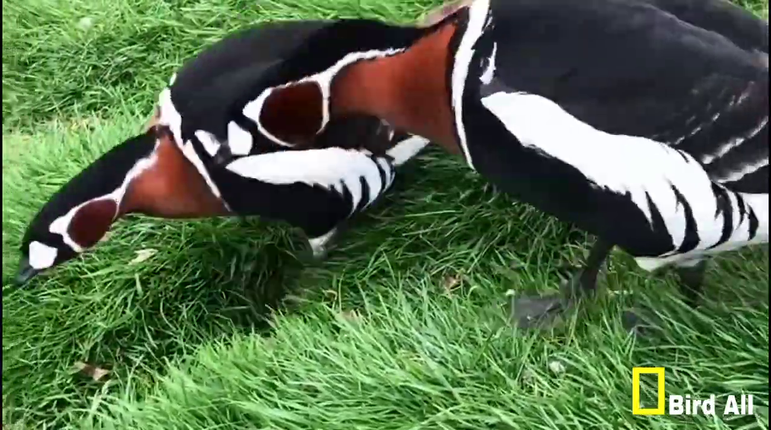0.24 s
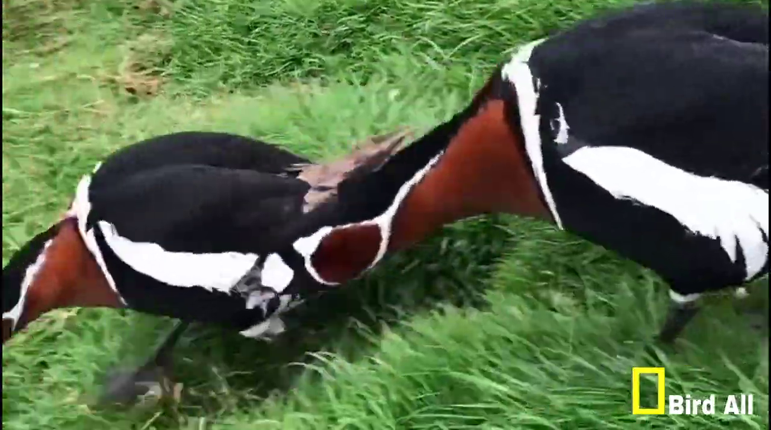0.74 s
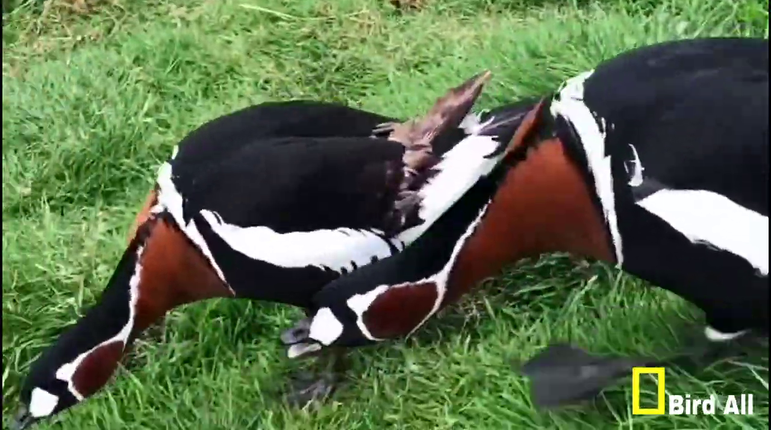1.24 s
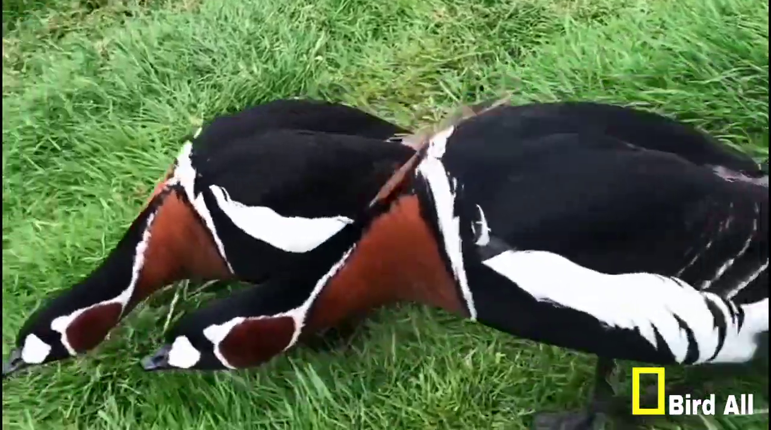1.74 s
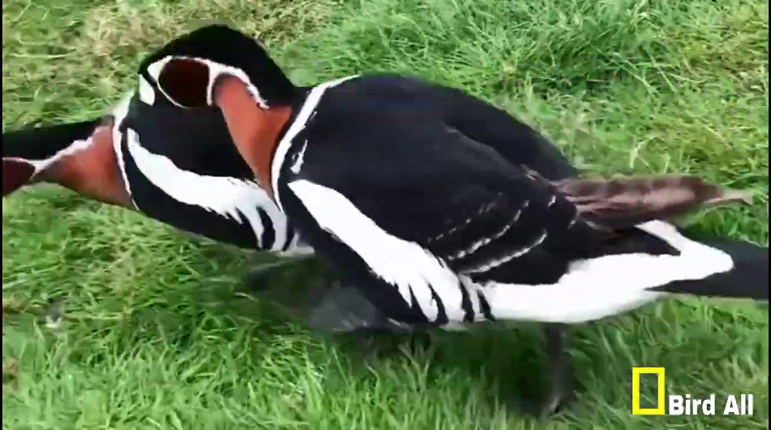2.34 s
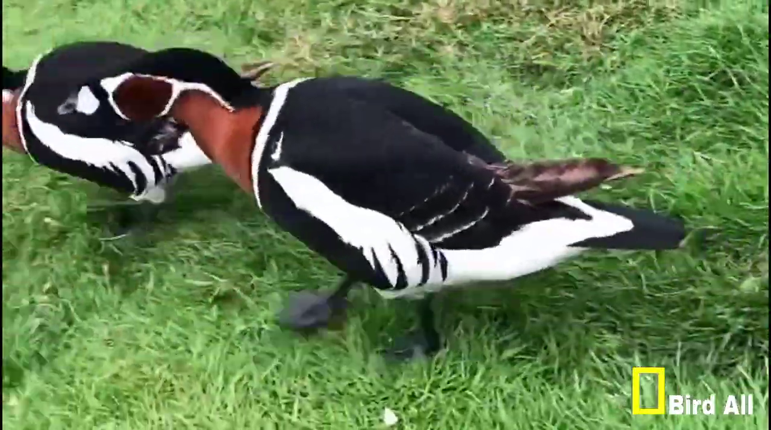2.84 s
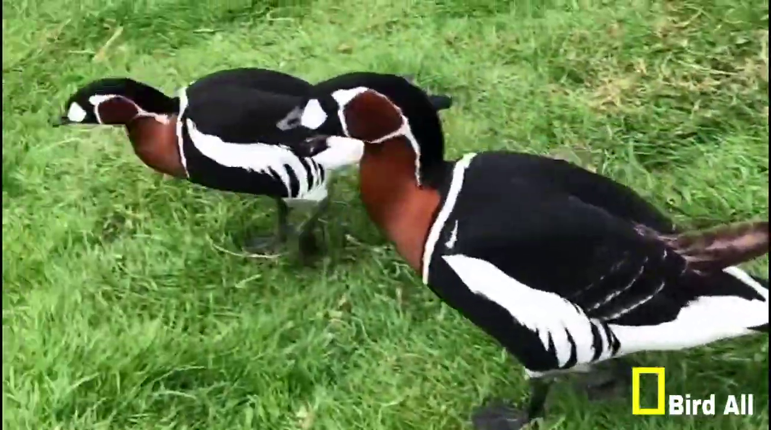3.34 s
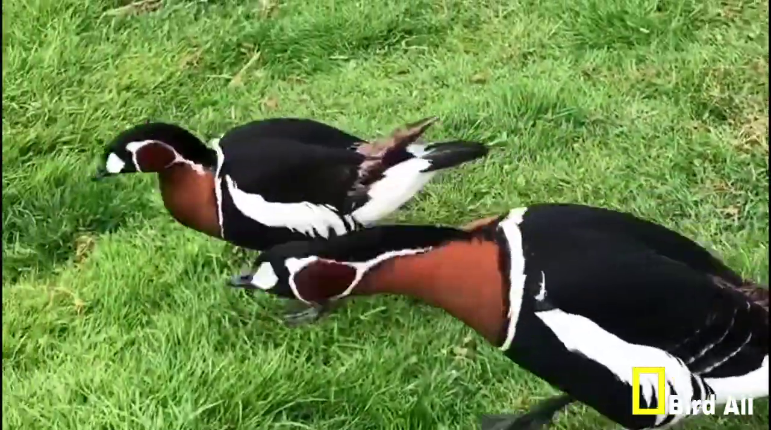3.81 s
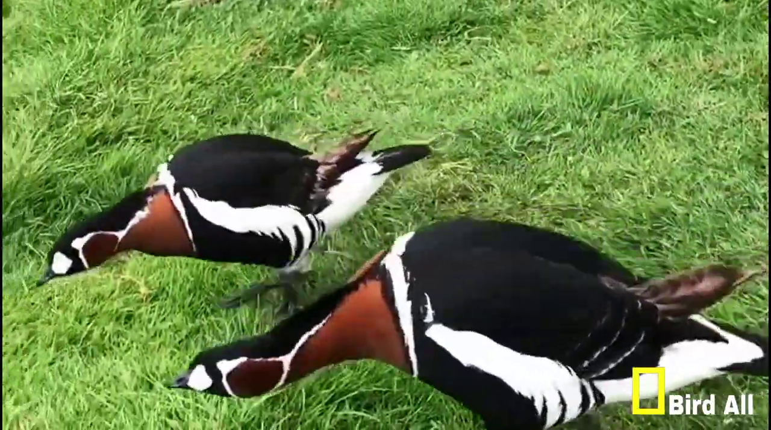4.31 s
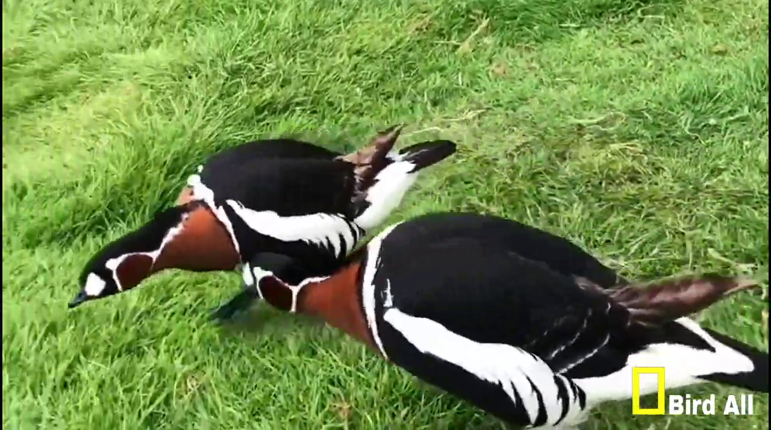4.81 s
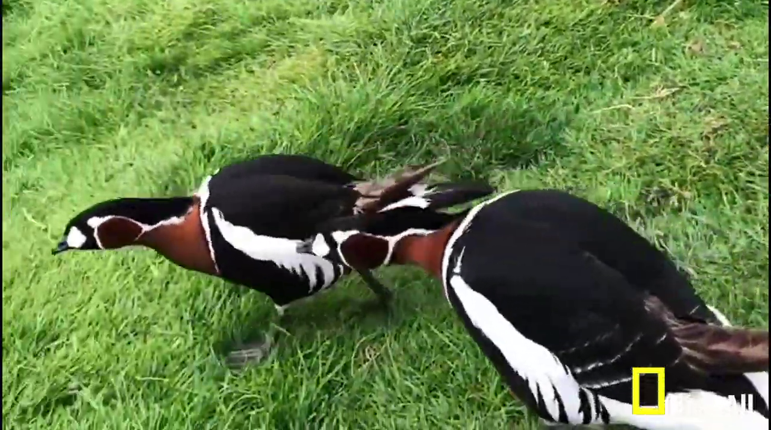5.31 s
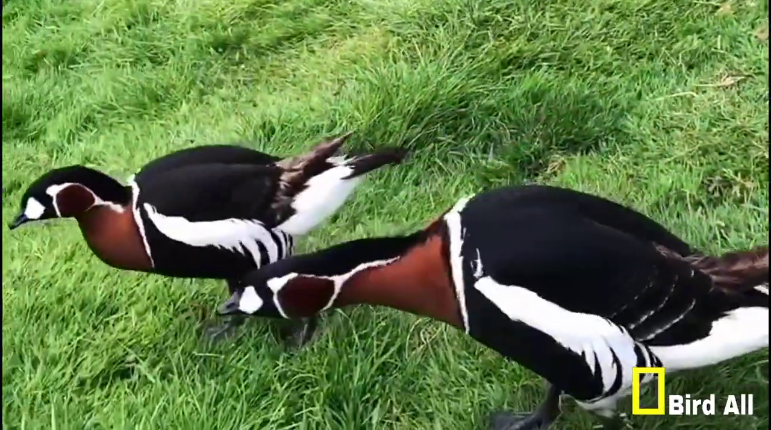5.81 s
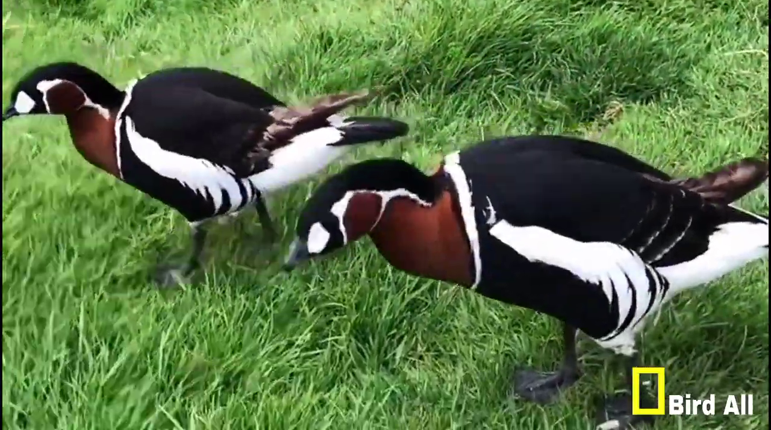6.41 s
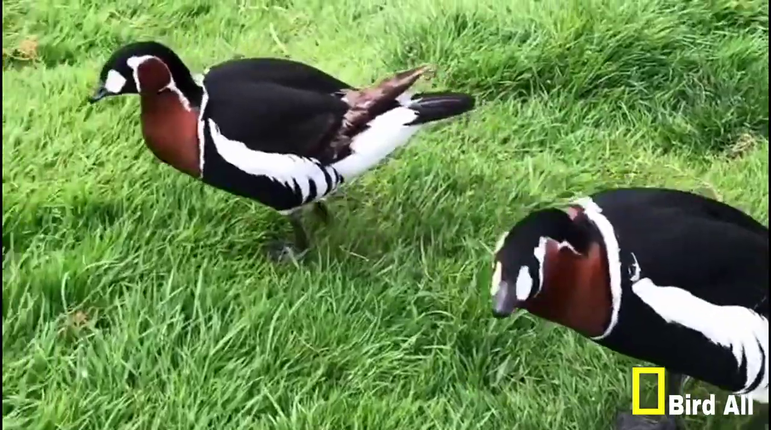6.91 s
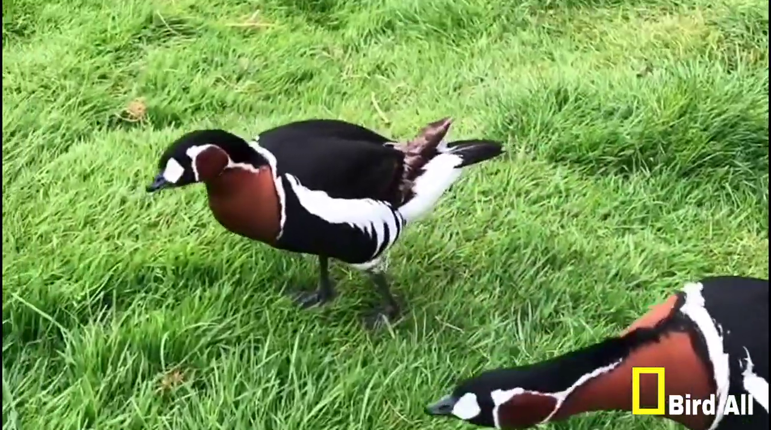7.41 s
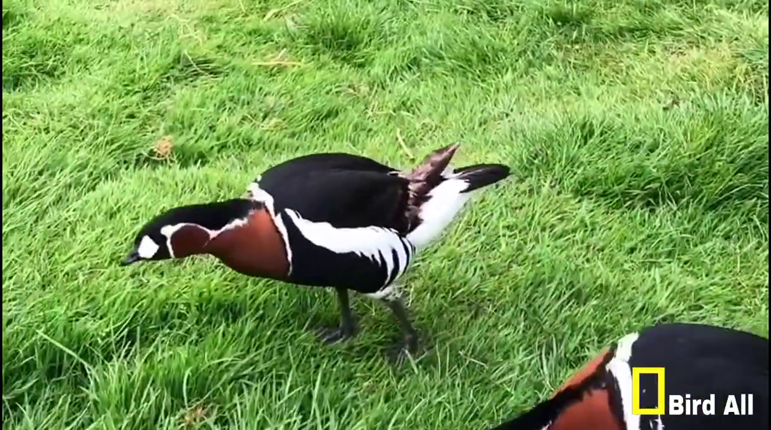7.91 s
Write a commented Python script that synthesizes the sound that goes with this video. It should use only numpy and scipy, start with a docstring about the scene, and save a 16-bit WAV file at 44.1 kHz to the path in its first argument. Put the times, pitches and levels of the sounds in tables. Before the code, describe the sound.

Geese squabble up close with short shrill yelps and low grunts, in three clusters, over faint songbird chirps outdoors.

```python
"""A faint outdoor rumble and a hiss of leaves, with small songbirds chirping in a long, wide echo.
Up close, red-breasted geese squabble on a lawn: seven shrill yelps with low grunts between them.
A yelp starts as a rasp (a slow membrane chops a fast one), clears into a whistle and slides down
an octave; a grunt is the slow membrane alone. Hoarse calls come from far off, later one soft thud."""
import sys
import numpy as np
from scipy import signal
from scipy.fft import rfft, irfft, next_fast_len
from scipy.io import wavfile
from scipy.ndimage import uniform_filter1d, minimum_filter1d, map_coordinates

SR = 44100
rng = np.random.default_rng(int(sys.argv[2]) if len(sys.argv) > 2 else 0)


def transcribe(signal):
    """Save signal, clipped to [-1, 1], as a 16-bit WAV file at the path in sys.argv[1]."""
    frames = np.atleast_2d(signal).T
    limited = np.clip(frames, -1, 1)
    pcm = np.round(limited * 32767).astype(np.int16)
    wavfile.write(sys.argv[1], SR, pcm)


N = 359415

# tone of the outdoor bed: frequency_hz, gain_db
AIR_SPECTRUM = [(15, -72), (25, -34.5), (50, -10.5), (69, -0.5), (150, -10.5), (301, -18), (856, -20),
                (1310, -21), (2180, -19.5), (3440, -21), (4870, -17.5), (6200, -22), (7090, -23),
                (8100, -25.5), (15000, -30.5)]
# stereo width of the bed: frequency_hz, side_over_mid_db
AIR_WIDTH = [(300, -51), (700, -19.5), (1300, -12.5), (2400, -5), (8000, 2.0)]
# single songbird notes: start_s, length_s, middle_hz, glide_octaves, relative_level_db, buzz_0_to_1,
# echo_send_db
SONG_NOTES = [ (0.068, .052, 7330, 0.35, -56, 0.2, -25), (.103, 0.067, 3270, -0.31, -59.5, 0.52, 6),
              (0.408, 0.28, 2450, 0.25, -60, .6, -7), (0.442, 0.13, 5730, -0.56, -52.5, 0.97, -12),
              (0.461, 0.22, 4430, 0.12, -59, 0.95, 9.5), (0.816, .13, 3810, .03, -36, 0.23, -3),
              (.93, 0.1, 4446, .08, -41, 1, 1), (1.001, 0.058, 4402, 0, -29.5, 0.2, -2.5),
              (1.052, .27, 3560, 0, -47, 0, -13), (1.932, 0.072, 4250, -.3, -47.5, 1, 9),
              (2.073, 0.15, 3616, -0.0065, -36, 0.28, -9), (2.192, .258, 3980, 0.1, -38, .55, -5.5),
              (2.14, 0.49, 2783, -.2, -54, 0.98, -2), (2.571, 0.09, 3050, 0.16, -48.5, .6, 2),
              (2.767, .06, 3410, -.4, -46.5, 1, 4.5), (2.835, 0.09, 6530, .18, -53, 1, 0),
              (3.797, .25, 5520, -0.02, -55.5, 0.08, -4), (4.066, 0.13, 6490, 0.041, -53.5, 0.2, -4),
              (4.485, 0.13, 5180, -0.24, -56.5, 0.88, -12), (4.835, 0.067, 3750, -.1, -59, 0, -11),
              (5.159, 0.044, 6690, 0.27, -57.5, 1, 12), (5.503, 0.043, 3870, -0.015, -52.5, .13, -5),
              (5.558, .084, 7140, -.12, -53.5, .5, 0), (5.804, .2, 5054, -0.18, -51.5, 1, -20.5),
              (6.118, 0.23, 7290, 0.24, -56, 0.09, -20.5), (6.343, 0.13, 2600, -0.014, -59, 0.53, 1.5),
              (6.774, 0.112, 2180, -0.25, -60, 0.27, 4.5), (6.792, 0.088, 5550, -0.25, -57, 0.7, -19.5),
              (7.037, 0.12, 2916, 0.32, -53, 0.77, 7), (7.381, 0.12, 4600, 0.27, -50.5, 0.9, -2.5),
              (7.56, .083, 2200, -0.011, -55.5, 0.14, 2), (7.613, 0.072, 3330, 0, -46.5, 0.1, 1),
              (7.711, .096, 7200, 0.034, -53, 0.9, -18), (8.01, .11, 2975, 0.12, -50.5, 1, 5.5)]
# songbird phrases on one repeated note: start_s, until_s, spacing_s, step_db, length_s, middle_hz,
# glide_octaves, relative_level_db, buzz_0_to_1, echo_send_db
SONG_PHRASES = [ (1.386, 1.85, .183, -1, .118, 7448, -.27, -28.5, .25, -5),
                (1.453, 2.13, .197, 3, 0.066, 3660, 0.474, -50.5, .7, 6.5)]
# goose yelps: start_s, rasp_s, whistle_s, slide_s, chop_hz, throat_tuning_ratio, rasp_hz, whistle_hz,
# scoop_octaves, bend_exponent (1 falls evenly, 2 hangs on first), level_db, after_break_db,
# rasp_treble_db, whistle_treble_db, slide_treble_db
GOOSE_YELPS = [ (.779, 0.041, .012, 0.078, 270.8, 0.95, 1760, 1666, 0.21, 1.2, -8, -6.5, -6.5, -5, 2.5),
               (1.265, 0.044, 0.049, 0.037, 284.4, 0.98, 2013, 1753, 0.011, 1.26, -7.5, -2, 0.5, 1, 0.5),
               (3.732, .037, 0.0067, 0.064, 265.8, 0.99, 1681, 1624, .2, 0.97, -8.5, -6.5, -4, -2.5, 1.5),
               (4.185, 0.045, 0.038, 0.044, 296.2, .93, 1864, 1698, 0.033, 1.12, -8.5, -7.5, -0.5, -0.5, 5),
               (4.922, 0.043, .036, 0.058, 285.6, 0.98, 1974, 1695, .18, 1.5, -10.5, -6.5, -5.5, -3.5, 1),
               (7.295, 0.0092, .027, 0.049, 247.6, 0.98, 1513, 1607, 0.52, 1.8, -11, 1.5, -22, 2.5, 6.5),
               (7.816, .032, 0.03, 0.063, 272.1, 0.97, 1907, 1737, .18, 2.25, -9, -1.5, 1.5, 1.5, 7)]
# the gaping throat while it rasps and while it whistles: frequency_hz, gain_db
THROAT_RASPING = [(600, -41), (1100, -13.5), (1550, 1.5), (2000, -3), (2600, -13.5), (3400, -6.5),
                  (4300, -16), (5200, -9), (5900, -3), (7000, -8), (9000, -19), (14000, -32.5)]
THROAT_WHISTLING = [(700, -1.5), (1050, -9), (1400, -1), (1900, 2), (2600, -3.5), (3050, -18.5), (3450, -3),
                    (4000, -16), (4900, -1.5), (5400, -5), (6500, -11), (8000, -19.5), (10000, -22),
                    (14000, -40.5)]
# the nearly closed bills of two grunting geese: frequency_hz, gain_db
MELLOW_BILL = [(130, -43.5), (240, 5), (330, -3), (520, -9.5), (900, -9.5), (1300, -4.5), (1750, 6),
               (2350, -9.5), (3200, -10.5), (4300, -23.5), (6000, -18), (9000, -23.5), (14000, -38)]
SHARP_BILL = [(140, 1), (300, -4), (600, -20), (900, -9.5), (1500, -1), (1800, -16), (2130, 4),
              (2450, -7.5), (3100, -10), (3650, -20), (4100, -9.5), (4800, -25.5), (6000, -14),
              (14000, -31)]
# goose grunts: start_s, length_s, rise_s, top_hz, level_db, treble_db, bill_spectrum
GOOSE_GRUNTS = [ (0.912, .15, 0.037, 223, -33, 5, MELLOW_BILL),
                (1.145, 0.15, 0.069, 234.4, -34, 3, MELLOW_BILL),
                (1.566, 0.099, .03, 305, -28.5, -0.5, SHARP_BILL),
                (3.962, 0.14, 0.044, 295.7, -33, 2.5, MELLOW_BILL),
                (4.748, .088, 0.031, 310.6, -31.5, -1.5, SHARP_BILL),
                (7.461, 0.14, 0.046, 253.6, -35, 1.5, MELLOW_BILL),
                (7.535, 0.073, 0.016, 207.3, -35, -1.5, MELLOW_BILL),
                (7.72, 0.11, 0.053, 250, -36, -6, MELLOW_BILL)]
# hoarse calls of far-off birds: start_s, length_s, centre_hz, relative_level_db
HOARSE_CALLS = [(2.866, 0.042, 1630, -52.5), (3.031, 0.052, 1630, -50.5), (3.174, 0.075, 1740, -55),
                (3.247, 0.096, 1550, -56.5), (3.442, 0.036, 2415, -51.5), (3.652, 0.044, 1975, -54)]
# their bill resonance: ratio_to_centre, gain_db
HOARSE_BILL = [(1 / 3, -30), (.64, -3), (1.14, 0), (2, -14), (5, -35)]

AIR_DB = -49.7
NOTE_ARCH_OCTAVES = .015  # how far a note's ends droop below a straight glide
TWITTER_PER_S, TWITTER_LOW_HZ, TWITTER_HIGH_HZ = 6, 3320, 7000
# the windpipe: spacing of its resonances, share of the sound that its open end sends back
PIPE_HZ, PIPE_REFLECTION = 647, .15
# a yelp scoops up, sags while it whistles, breaks to a lower note and slides until the membrane stops
SCOOP_S, CLEARING_S, BREAK_S, BREAK_HZ, BROKEN_HZ, LAST_HZ = .01, .011, .0097, 1519, 1351, 746
# it swells in, is weaker in the rasp, dips as it clears, peaks mid-whistle and fades with the slide
ATTACK_DB, ATTACK_S, RELEASE_DB, RELEASE_S = -14.5, .0082, -8.5, .006
RASP_DB, CLEARING_DB, WHISTLE_SWELL_DB, DROP_S, FADE_DB_PER_OCTAVE = -3, -2, 3, .0043, 21.5
# the voice shudders, most after the break; the share is its depth before the break
SHUDDER_PER_S, SHUDDER_OCTAVES, SHUDDER_DB, SHUDDER_TREBLE_DB, SHUDDER_SHARE = 140, .03, 4, -1.5, .41
# the breaking pitch crosses a resonance of the throat and turns pure for a moment
PURE_HZ, PURE_WIDTH_HZ, PURE_TREBLE_DB = 1400, 40, -10.5
# after the break some rasp comes back, more of it the lower the voice slides
FRAY, FRAY_PER_OCTAVE = .19, .2
# the two ends of a grunt: pulse rate, and level against its peak
GRUNT_FIRST_HZ, GRUNT_LAST_HZ, GRUNT_FIRST_DB, GRUNT_LAST_DB = 194.7, 172.3, -10, -16.5
LAWN_T60_S, HIGH_CUT_HZ = .7, 14200


def undb(db):
    """Decibels to gain."""
    return 10 ** (np.asarray(db) / 20)


def unit(x):
    """Scale to rms 1."""
    return x / np.sqrt(np.mean(x ** 2) + 1e-20)


def gain_at(spectrum, hz):
    """Gain of a (frequency_hz, gain_db) curve at any frequency."""
    points_hz, db = np.transpose(spectrum)
    return undb(np.interp(np.log(hz + 1), np.log(points_hz), db))


def colour(x, spectrum):
    """Minimum-phase EQ: it rings after a pulse, never before."""
    size = next_fast_len(len(x) + 4096)
    cepstrum = irfft(np.log(gain_at(spectrum, np.fft.rfftfreq(size, 1 / SR))), size)
    cepstrum[1:size // 2] *= 2
    cepstrum[size // 2 + 1:] = 0
    return irfft(rfft(x, size) * np.exp(rfft(cepstrum)), size)[:len(x)]


def wander(count, rate):
    """Smooth random modulation with spread near 1 and `rate` new values a second."""
    place = np.arange(count) / SR * rate
    return map_coordinates(rng.standard_normal(4096), [place], order=3, mode="wrap")


def add(track, start_s, sound):
    """Mix a sound into a track."""
    i = max(int(start_s * SR), 0)
    track[i:i + len(sound)] += sound[:max(N - i, 0)]


def echo(x, t60_s):
    """Diffuse reflections that die away."""
    t = np.arange(2 * SR) / SR
    tail = rng.standard_normal(len(t)) * np.exp(-np.log(1000) * t / t60_s)
    return signal.fftconvolve(x, tail / np.sqrt(np.sum(tail ** 2)))[:N]


def outdoors():
    """The bed: a distant, centred rumble under a wide and gently swelling hiss of leaves."""
    mid, side = (colour(rng.standard_normal(N), AIR_SPECTRUM) for _ in range(2))
    air = (mid + np.array([[1], [-1]]) * colour(side, AIR_WIDTH)) / np.std(mid)
    rumble = signal.sosfilt(signal.butter(1, 700, fs=SR, output="sos"), air)
    leaves = (air - rumble) * undb(-6 + 1.3 * wander(N, 3) + .9 * wander(N, 14))
    return (rumble + leaves) * undb(AIR_DB)


def songbirds():
    """Gliding near-sines, some of them buzzy, with a long echo that differs at each ear."""
    direct, send = np.zeros((2, N)), np.zeros(N)
    for start, length, middle_hz, glide, db, buzz, echo_db in SONG_NOTES + phrases() + twitter():
        count = int(length * SR)
        progress = np.linspace(-.5, .5, count)
        hz = middle_hz * 2 ** (glide * progress - NOTE_ARCH_OCTAVES * (2 * progress) ** 2)
        hz *= 1 + .06 * buzz * wander(count, 300)
        flutter = undb((1.2 + 3 * buzz) * wander(count, 90))
        swell = np.sqrt(2) * undb(db) * unit(signal.windows.tukey(count, .3) * flutter)
        phase = 2 * np.pi * np.cumsum(hz) / SR
        # each perch reaches the two ears with its own phase lag
        for ear, lag in enumerate([0, rng.uniform(2.0, 2.47)]):
            add(direct[ear], start, swell * np.sin(phase + lag))
        add(send, start, swell * undb(echo_db) * np.sin(phase))
    foliage_blur = np.array([echo(ear, t60_s=.15) for ear in direct])
    long_echo = np.array([echo(send, t60_s=2.2) for _ in range(2)])
    return undb(4) * direct + foliage_blur + long_echo


def twitter():
    """Faint short notes of many far birds, each with its own moment, pitch, glide and buzz."""
    notes, echo_db = [], -10
    chance = rng.random((int(TWITTER_PER_S * N / SR), 6))
    for k, (when, length, pitch, glide, loud, buzz) in enumerate(chance):
        start_s, length_s = (k + when) / TWITTER_PER_S, .035 * (.5 + length)
        hz = TWITTER_LOW_HZ * (TWITTER_HIGH_HZ / TWITTER_LOW_HZ) ** pitch
        glide_octaves = .31 * (2 * glide - 1)
        db = -57.5 + 3.5 * (2 * loud - 1)
        notes.append((start_s, length_s, hz, glide_octaves, db, buzz, echo_db))
    return notes


def phrases():
    """A songbird repeats its note at an even pace, growing or fading."""
    return [(start, length, hz, glide, db + k * step_db, buzz, echo_db)
            for first, until, spacing, step_db, length, hz, glide, db, buzz, echo_db in SONG_PHRASES
            for k, start in enumerate(np.arange(first, until, spacing))]


def windpipe(hz):
    """Complex gain of the windpipe: evenly spaced resonances, and the treble leaves a little late."""
    lag = np.exp(-1j * np.pi * (hz / 2300) ** 2)
    return lag / (1 - PIPE_REFLECTION * np.exp(-2j * np.pi * hz / PIPE_HZ))


def throat(spectrum, tuning, treble_db, hz):
    """Gain of a throat with its resonances shifted by `tuning`; harder blowing lifts the treble."""
    return gain_at(spectrum, hz / tuning) * undb(treble_db / (1 + (3000 / hz) ** 4))


def voiced(x, spectrum):
    """Sound that has passed through the windpipe and the bill; rms 1."""
    size = next_fast_len(2 * len(x))
    piped = irfft(rfft(x, size) * windpipe(np.fft.rfftfreq(size, 1 / SR)), size)[:len(x)]
    return unit(colour(piped, spectrum))


def membrane(cycles, hz, spectrum, tuning, treble_db, count=18):
    """Harmonics of a beating membrane, shaped by windpipe and throat; rms near 1."""
    k = np.arange(1, count + 1)[:, None]
    weights = throat(spectrum, tuning, treble_db, k * hz) * windpipe(k * hz / tuning) * (k * hz < SR / 2)
    tone = np.sum(weights * np.exp(2j * np.pi * k * cycles), axis=0).real
    return tone / np.sqrt(np.sum(abs(weights) ** 2, axis=0) / 2)


def pulses(cycles):
    """One click of uneven strength at each whole cycle, shared between neighbouring samples."""
    samples = np.arange(len(cycles))
    click_at = np.interp(np.arange(np.ceil(cycles[-1])), cycles, samples)
    strengths = undb(1.3 * rng.standard_normal(len(click_at)))
    return strengths @ np.sinc(samples - click_at[:, None] - 4)


def yelp_effort(rasp_s, whistle_s, slide_s, rasp_hz, whistle_hz, scoop, bend, level_db, after_break_db,
                rasp_treble_db, whistle_treble_db, slide_treble_db):
    """Pitch, level, rasp and treble envelopes of a yelp through rasp, whistle, break and slide."""
    t = np.arange(int((rasp_s + whistle_s + slide_s) * SR)) / SR
    ramp = lambda start_s, length_s: np.clip((t - start_s) / length_s, 0, 1)
    break_at = rasp_s + whistle_s
    rasping = 1 - ramp(rasp_s - CLEARING_S / 2, CLEARING_S)
    broken = ramp(break_at + BREAK_S, DROP_S)
    whistling = 1 - rasping - broken
    slid_octaves = np.log2(BROKEN_HZ / LAST_HZ) * ramp(break_at, slide_s) ** bend
    depth = SHUDDER_SHARE + (1 - SHUDDER_SHARE) * broken
    pitch_shudder, level_shudder, tone_shudder = (depth * wander(len(t), SHUDDER_PER_S) for _ in range(3))

    sag_hz = (whistle_hz - BREAK_HZ) * ramp(rasp_s, whistle_s) ** 1.6
    step_hz = (BREAK_HZ - BROKEN_HZ) * ramp(break_at, BREAK_S)
    clear_hz = (whistle_hz - sag_hz - step_hz) * 2 ** -slid_octaves
    detune_octaves = SHUDDER_OCTAVES * pitch_shudder - scoop * np.exp(-t / SCOOP_S)
    hz = (rasping * rasp_hz + (1 - rasping) * clear_hz) * 2 ** detune_octaves

    edges_db = ATTACK_DB * np.exp(-t / ATTACK_S) + RELEASE_DB * np.exp((t - t[-1]) / RELEASE_S)
    rasp_db = RASP_DB * rasping + CLEARING_DB * np.exp(-((t - rasp_s) / CLEARING_S) ** 2)
    swell_db = WHISTLE_SWELL_DB * (np.sin(np.pi * ramp(rasp_s, whistle_s + BREAK_S)) - .5) * whistling
    slide_db = after_break_db * broken - FADE_DB_PER_OCTAVE * slid_octaves
    db = level_db + edges_db + rasp_db + swell_db + slide_db + SHUDDER_DB * level_shudder

    pure_db = PURE_TREBLE_DB * np.exp(-((clear_hz - PURE_HZ) / PURE_WIDTH_HZ) ** 2)
    treble_db = rasping * rasp_treble_db + whistling * whistle_treble_db + broken * slide_treble_db
    treble_db += pure_db + SHUDDER_TREBLE_DB * tone_shudder
    rasp = np.clip(rasping + FRAY * broken + FRAY_PER_OCTAVE * slid_octaves, 0, 1)
    return t, hz, db, rasp, treble_db


def yelp(chop_hz, tuning, effort):
    """A rasp that clears into a falling whistle and frays as the pressure runs out."""
    t, hz, db, rasp, treble_db = effort
    count = len(t)
    slack = np.clip((1520 - hz) / 400, 0, 1)
    hz = uniform_filter1d(hz, size=130)
    jitter = (.004 + .011 * slack + .016 * rasp) * wander(count, 1500)
    cycles = np.cumsum(hz * (1 + jitter)) / SR
    shimmer = undb((.3 + 1.3 * slack) * wander(count, 500))
    whistle = membrane(cycles, hz, THROAT_WHISTLING, tuning, treble_db) * shimmer
    # the slow membrane speeds up at the start; each opening restarts the fast one
    chops = np.cumsum(chop_hz * (1 - .45 * np.exp(-t / .008)) * (1 + .015 * wander(count, 250))) / SR
    opened, chop_phase = np.searchsorted(chops, np.floor(chops)), chops % 1
    gate = unit((1 - np.exp(-chop_phase / .89)) * np.exp(-chop_phase / .62) * (1 - chop_phase ** 8))
    burst = gate * membrane(cycles - cycles[opened], hz, THROAT_RASPING, tuning, treble_db)
    slaps = undb(-7) * voiced(pulses(chops), THROAT_RASPING)
    thump = undb(-18) * np.sin(2 * np.pi * chops)
    # turbulent air hisses most where the membranes beat unevenly
    hiss = voiced(rng.standard_normal(count), THROAT_RASPING)
    hiss *= undb(-30) + undb(-14) * rasp * gate + undb(-13) * slack
    voice = (rasp * (burst + slaps + thump) + (1 - rasp) * whistle) / np.hypot(rasp, 1 - rasp)
    fades = np.clip(np.minimum(t / .00025, (t[-1] - t) / .002), 0, 1)
    return (voice + hiss) * undb(db) * fades


def grunt_effort(length_s, rise_s, top_hz, peak_db):
    """One slightly unsteady arch of effort: pulse rate and level rise from rest and sink back."""
    t = np.arange(int(length_s * SR)) / SR
    ease = np.interp(t, [0, rise_s, length_s], [1, 0, 1])
    rest_hz = np.where(t < rise_s, GRUNT_FIRST_HZ, GRUNT_LAST_HZ)
    rest_db = np.where(t < rise_s, GRUNT_FIRST_DB, GRUNT_LAST_DB)
    wobble = wander(len(t), rate=70)  # moves pitch by about .025 octaves and level by about 1 dB
    hz = (top_hz + (rest_hz - top_hz) * ease ** 1.6) * 2 ** (.025 * wobble)
    return t, hz, peak_db + rest_db * ease ** 1.38 + wobble


def grunt(bill, treble_db, effort):
    """The slow membrane alone; the bill opens as the pitch arches, and its resonances rise with it."""
    t, hz, db = effort
    hz = uniform_filter1d(hz, size=600)
    cycles = np.cumsum(hz * (1 + .011 * wander(len(t), 250))) / SR
    opening = (hz / hz.max()) ** .7
    treble_db = treble_db + 30 * (opening - 1)  # a closing bill muffles the treble
    buzz = membrane(cycles, hz, bill, opening, treble_db, count=48) * undb(1.2 * wander(len(t), 150))
    puffs = np.exp(-(cycles % 1) / .35) * rng.standard_normal(len(t))
    breath = undb(-13) * voiced(puffs, bill)
    return (buzz + breath) * undb(db) * signal.windows.tukey(len(t), .06)


def geese():
    """The geese sit dead centre; the lawn returns a short scatter and a very faint tail."""
    out = np.zeros(N)
    for start, rasp_s, whistle_s, slide_s, chop_hz, tuning, *voice in GOOSE_YELPS:
        add(out, start, yelp(chop_hz, tuning, yelp_effort(rasp_s, whistle_s, slide_s, *voice)))
    for start, length_s, rise_s, top_hz, db, treble_db, bill in GOOSE_GRUNTS:
        add(out, start, grunt(bill, treble_db, grunt_effort(length_s, rise_s, top_hz, db)))
    scatter = undb(-12) * echo(out, t60_s=.05)
    return out + scatter + undb(-36) * echo(out, t60_s=LAWN_T60_S)


def far_calls():
    """Hoarse breath through windpipe and bill, so far off that it arrives as echo."""
    out = np.zeros(N)
    for start, length, centre_hz, db in HOARSE_CALLS:
        breath = rng.standard_normal(int(length * SR))
        bill = [(centre_hz * ratio, gain_db) for ratio, gain_db in HOARSE_BILL]
        add(out, start, undb(db + 7.5) * voiced(breath, bill) * signal.windows.tukey(len(breath), .3))
    return np.array([echo(out, t60_s=.24) for _ in range(2)])


def soft_thud():
    """One dull, low bump close by: a short sine with soft edges."""
    out, t = np.zeros(N), np.arange(int(.06 * SR)) / SR
    add(out, start_s=5.83, sound=undb(-46) * np.sin(2 * np.pi * 142 * t) * np.hanning(len(t)))
    return out


def scene():
    """Open air and other birds all around, geese up front."""
    return outdoors() + songbirds() + geese() + far_calls() + soft_thud()


def record(dry):
    """A limiter holds any peak to full scale, then a steep high cut takes off the very top."""
    allowed = 1 / np.maximum(np.max(abs(dry), axis=0), 1)
    gain = uniform_filter1d(minimum_filter1d(allowed, size=221), size=221)
    return signal.sosfilt(signal.ellip(8, .2, 70, HIGH_CUT_HZ, fs=SR, output="sos"), dry * gain)


dry = scene()
out = record(dry)
transcribe(out)
```